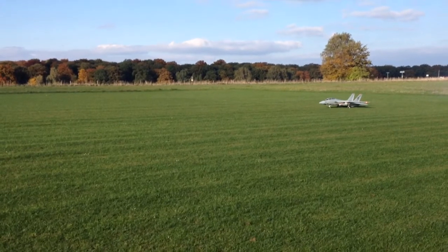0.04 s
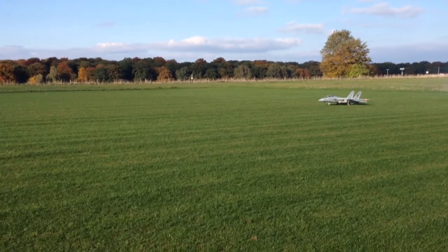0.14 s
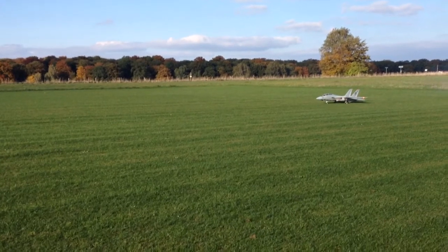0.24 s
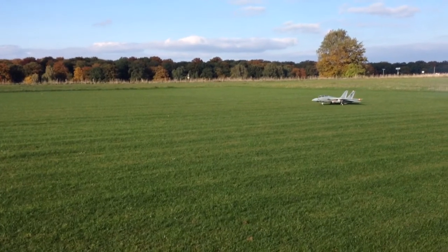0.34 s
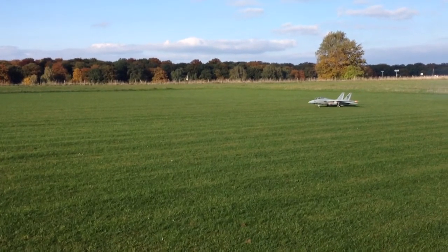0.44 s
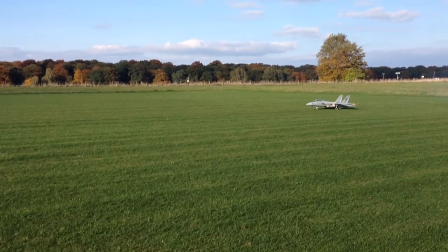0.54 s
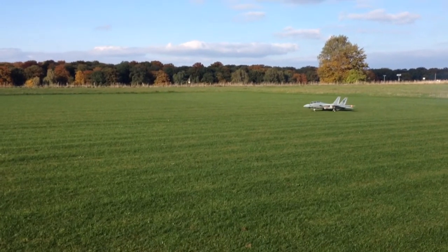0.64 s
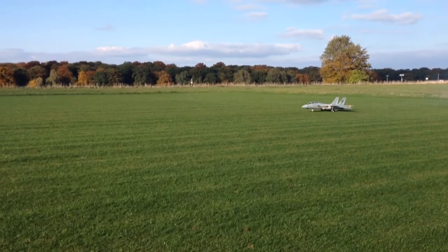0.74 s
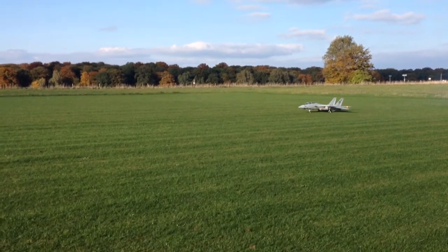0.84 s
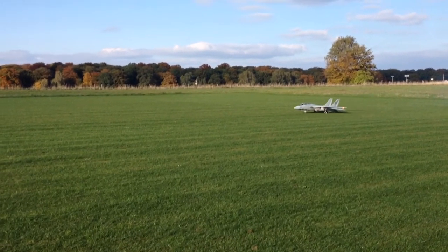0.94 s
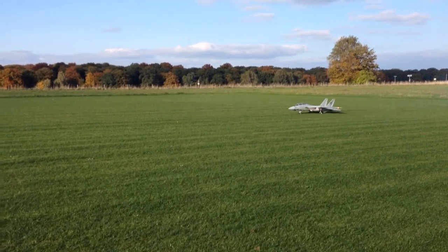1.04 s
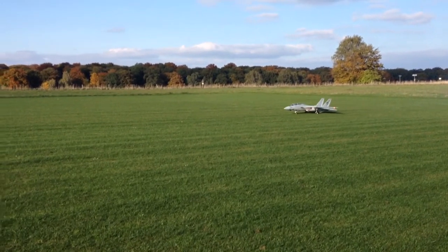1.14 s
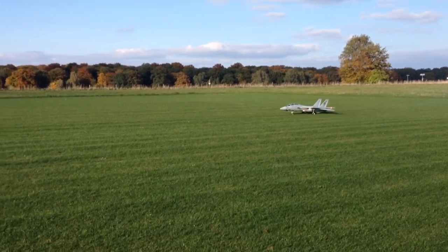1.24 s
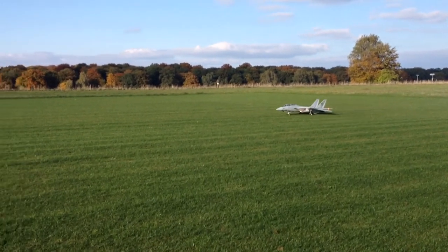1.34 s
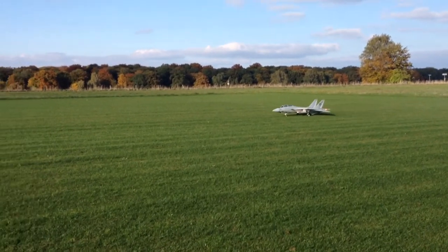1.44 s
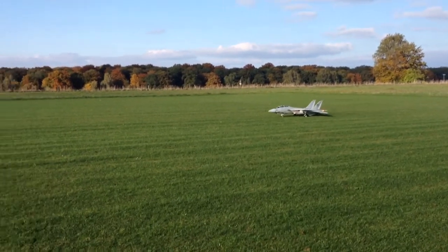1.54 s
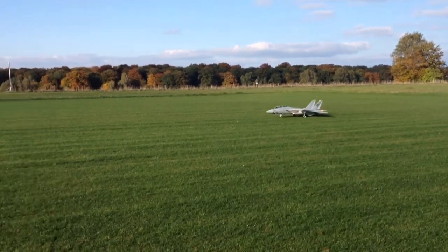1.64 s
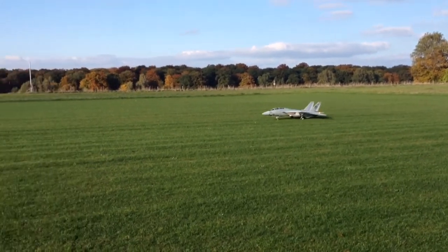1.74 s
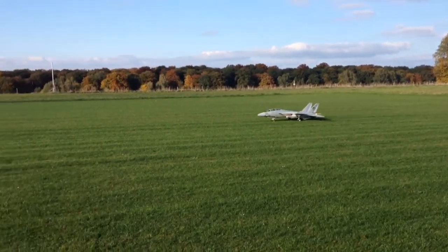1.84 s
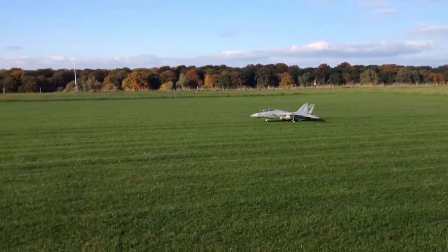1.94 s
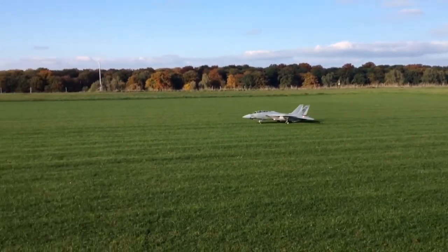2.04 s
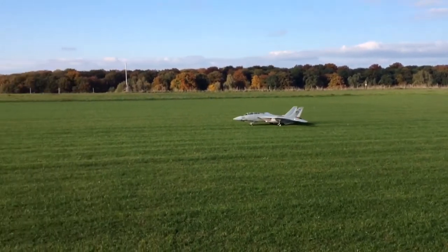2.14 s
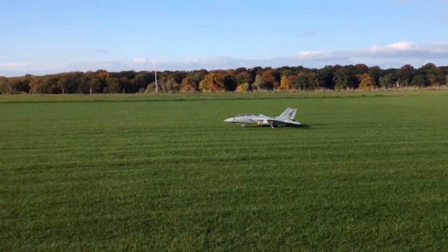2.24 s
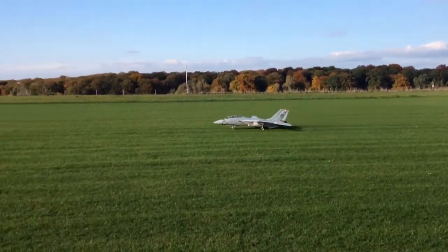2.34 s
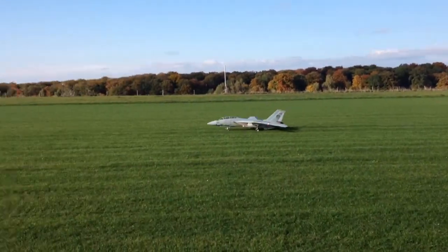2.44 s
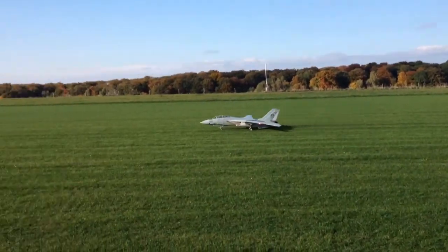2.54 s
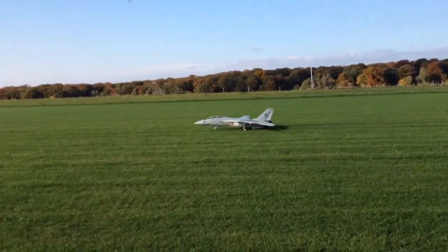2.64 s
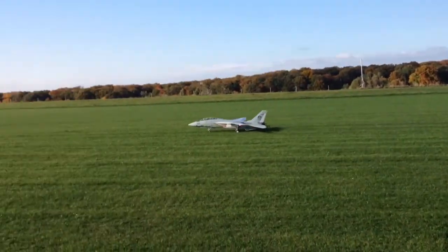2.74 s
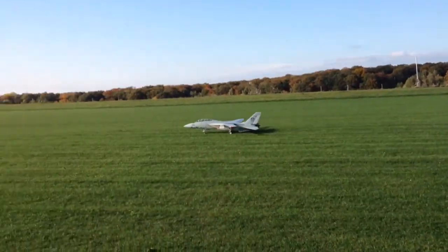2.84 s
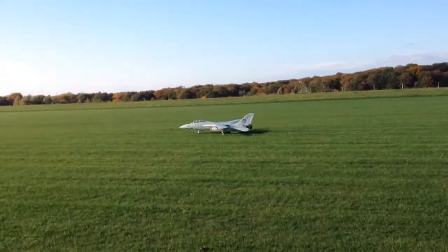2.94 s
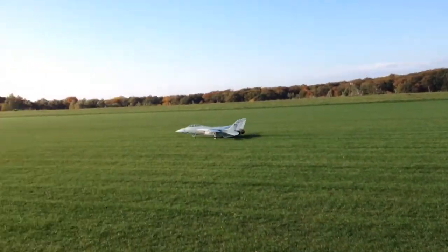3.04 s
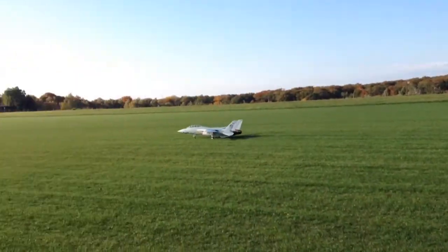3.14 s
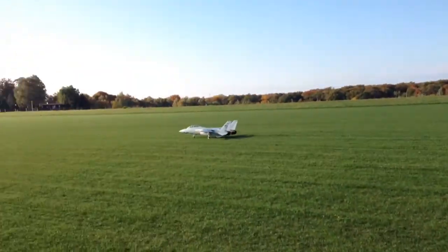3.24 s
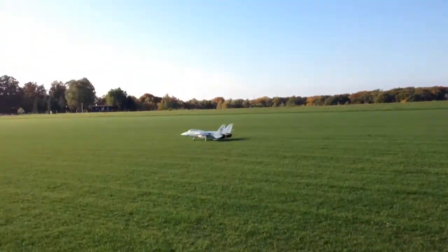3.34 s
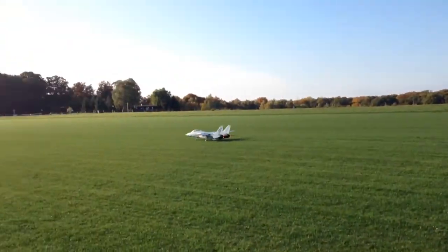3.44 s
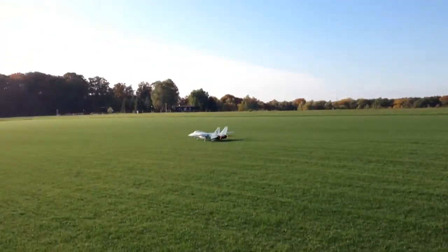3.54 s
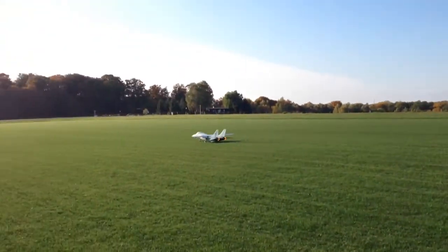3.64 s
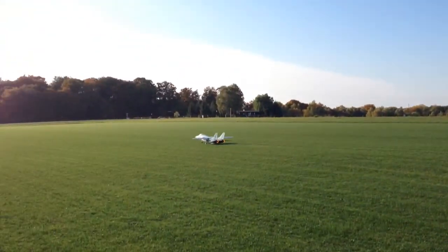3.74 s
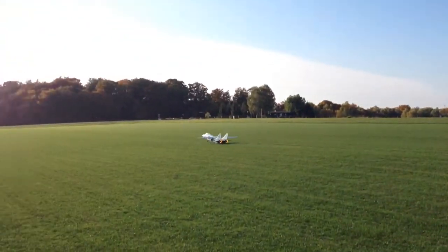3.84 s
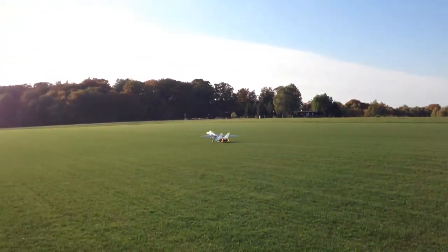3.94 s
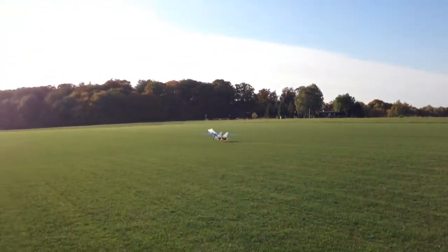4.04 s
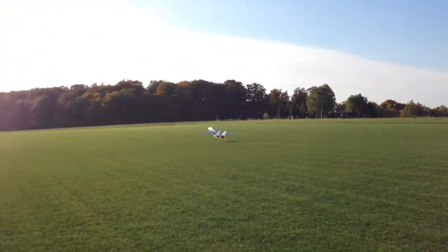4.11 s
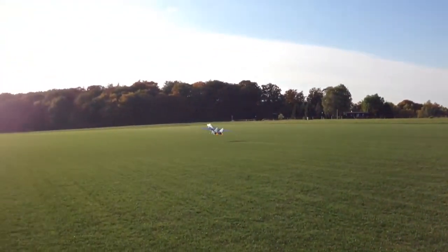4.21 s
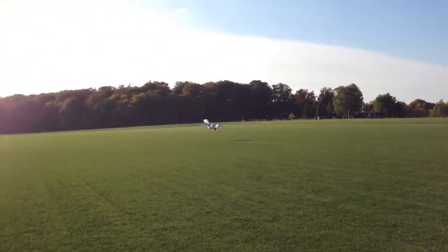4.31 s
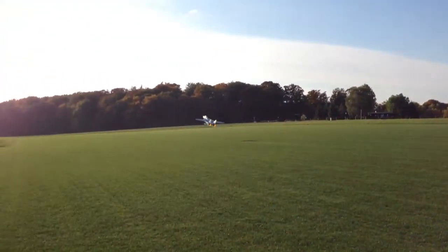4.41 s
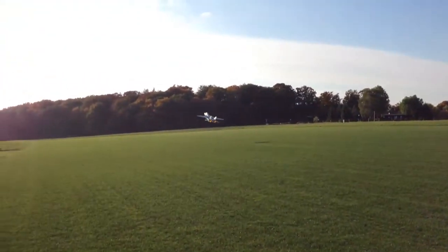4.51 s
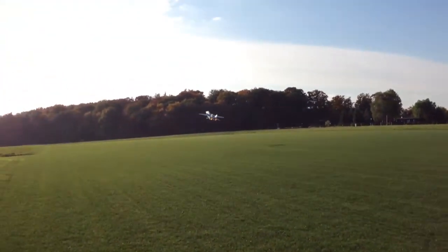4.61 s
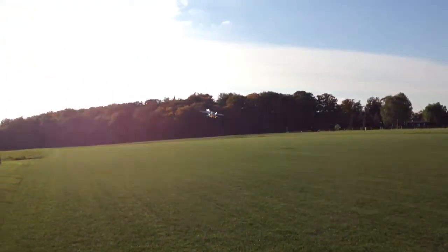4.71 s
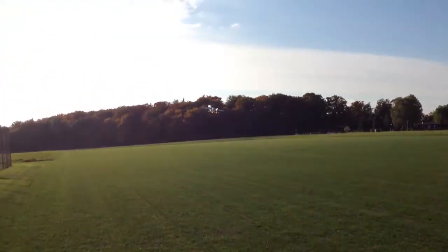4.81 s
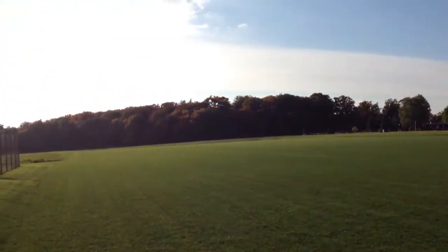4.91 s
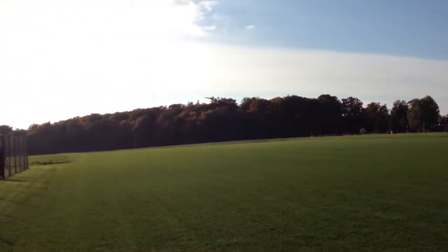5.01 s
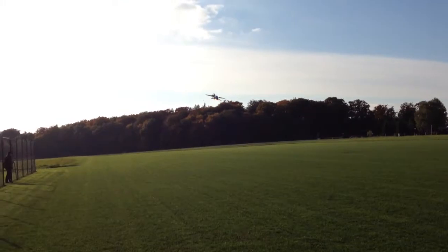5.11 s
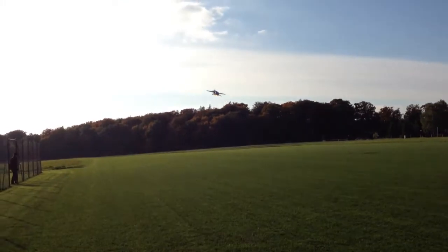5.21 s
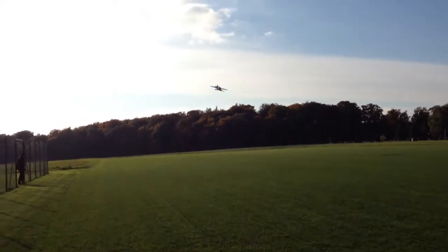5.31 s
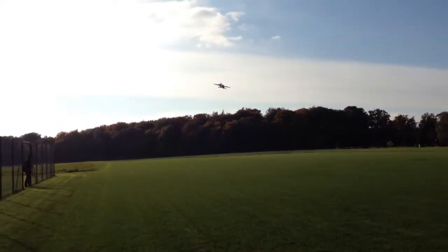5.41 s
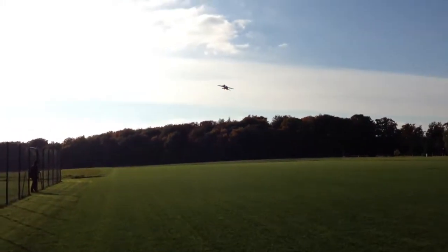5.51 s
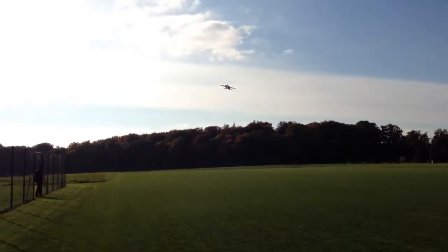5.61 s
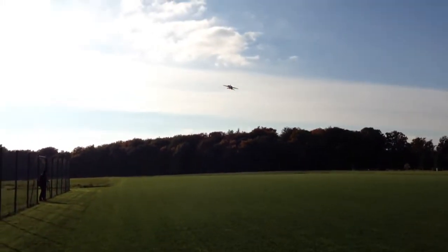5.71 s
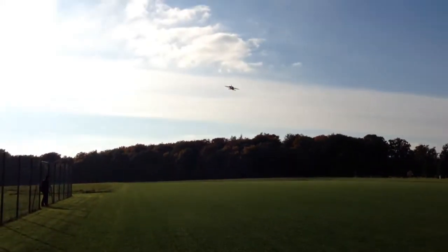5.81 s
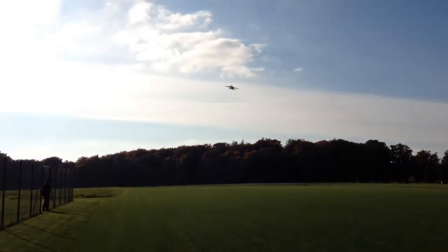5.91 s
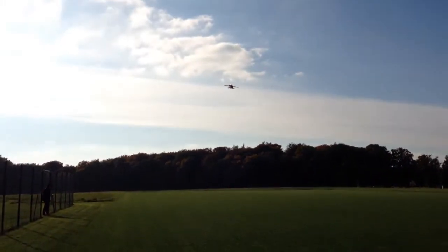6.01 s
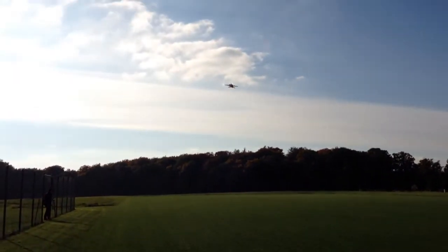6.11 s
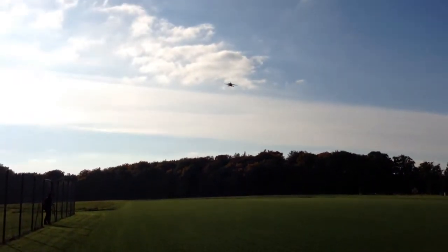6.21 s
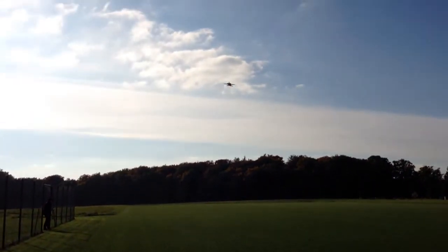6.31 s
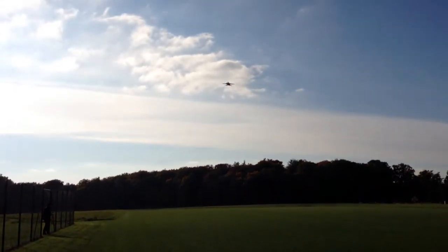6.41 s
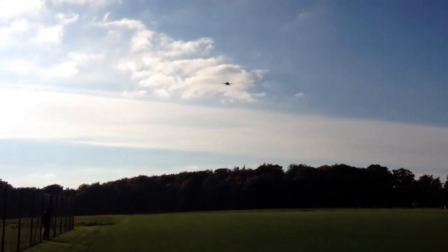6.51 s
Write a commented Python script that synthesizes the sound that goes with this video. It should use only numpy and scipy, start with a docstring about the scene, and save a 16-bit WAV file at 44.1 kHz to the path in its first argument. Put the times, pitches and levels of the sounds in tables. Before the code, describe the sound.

A small jet spools up with a thin rising whistle, rushes by on grass and roars off into the sky.

```python
"""Model jet taking off from grass

Two small turbines spool up; the jet drums over the turf, races past, lifts off and climbs away.
Its compressors whine ahead of it, its exhaust hisses sideways and roars behind, over a faint field rumble.
The echo off the grass lags more as the jet climbs, so a comb of notches sweeps down through the roar."""
import sys
import numpy as np
from scipy import signal
from scipy.fft import rfft, irfft, next_fast_len
from scipy.io import wavfile
from scipy.ndimage import map_coordinates

SR = 44100
rng = np.random.default_rng(int(sys.argv[2]) if len(sys.argv) > 2 else 0)


def waveform_to_disk(signal):
    """Save audio, clipped to [-1, 1], as 16-bit WAV at the path in sys.argv[1]."""
    frames = np.transpose(np.atleast_2d(signal))
    scaled = np.clip(frames, -1, 1) * 32767
    samples = np.round(scaled).astype(np.int16)
    wavfile.write(sys.argv[1], SR, samples)


N = 289336
TIME = np.arange(N) / SR
PASS_S, PASS_M, PASS_M_PER_S = 2.865, 12.6, 13  # the closest point: when, how near, how fast
ACCEL_M_PER_S2, LIFT_OFF_S = 4.9, 4.28
# the first turbine spools up to full power: (time [s], blade tone [Hz])
SPOOL_UP = [(0, 8500), (.3, 10370), (.5, 11380), (1, 12900), (1.35, 13800), (1.6, 14050), (2.2, 14180),
            (2.7, 14140)]


def amp(db):
    """Decibels to gain."""
    return 10 ** (np.asarray(db) / 20)


def along(table, hz):
    """Each column of a spectrum table, read on a log axis."""
    knots_hz, *columns = np.transpose(table)
    return [np.interp(np.log(hz + 1), np.log(knots_hz + 1), column) for column in columns]


def curves(table, t):
    """Each column of a time table, read at the times t."""
    knots_s, *columns = np.transpose(table)
    return [np.interp(t, knots_s, column) for column in columns]


def bell(x, centre, width):
    """A smooth hump of height 1."""
    return np.exp(-((x - centre) / width) ** 2)


def wobble(rate):
    """A smooth random curve, rate knots a second."""
    return map_coordinates(rng.standard_normal(int(N * rate / SR) + 4), [TIME * rate])


def rush(colour, frame=2048, hop=512):
    """Noise of steady rms 1 whose spectral shape follows colour(Hz, s)."""
    hz, t, spectra = signal.stft(rng.standard_normal(N), SR, nperseg=frame, noverlap=frame - hop)
    gain = colour(hz[:, None], t)
    gain = gain / np.sqrt(np.mean(gain ** 2, axis=0))
    noise = signal.istft(spectra * gain, SR, nperseg=frame, noverlap=frame - hop)[1][:N]
    return noise / np.sqrt(np.mean(noise ** 2) + 1e-20)


def speed(t):
    """The jet gains speed evenly [m/s]."""
    return PASS_M_PER_S + ACCEL_M_PER_S2 * (t - PASS_S)


def bearing(t):
    """Angle from the nose to the listener [rad]; its sine is the nearness, 1 at the closest point."""
    past_m = (t - PASS_S) * (speed(t) + PASS_M_PER_S) / 2
    return np.arctan2(PASS_M, -past_m)


def receding(t):
    """0 on approach, rising towards 1 as the jet goes away."""
    start = np.cos(bearing(0))
    return (start - np.cos(bearing(t))) / (start + 1)


def tilt(t, base_db, low_power_db, near_db, away_db, cone_db):
    """Brightness [dB per octave] from turbine power, nearness and the exhaust's backward cone."""
    blade_hz, = curves(SPOOL_UP, t)
    low_power = (blade_hz.max() - blade_hz) / np.ptp(blade_hz)
    near = np.sin(bearing(t)) ** 2
    cone = bell(np.degrees(bearing(t)), centre=141.5, width=12.7)
    return base_db + low_power_db * low_power + near_db * near + away_db * receding(t) + cone_db * cone


def ground_comb(hz, t, rolling_lag_s=.00022, lag_s_per_s=.000905, rotate_s=.14, grazing=.93, closest=.44):
    """The echo off the grass combs the sound: later as the jet climbs, deepest at grazing angles."""
    # grass as a mirror: (frequency [Hz], share reflected [0-1], phase lag [turns])
    grass = [(120, .7, .03), (220, .85, .055), (330, .9, .135), (650, .82, .125), (1200, .72, .11),
             (2000, .32, .05), (2800, .48, .02), (4000, .45, .01), (5500, .15, .01), (9000, .08, .01)]
    share, turns = along(grass, hz)
    climb_s = rotate_s * np.logaddexp(0, (t - LIFT_OFF_S) / rotate_s)  # eases into the climb
    lag_s = rolling_lag_s + lag_s_per_s * climb_s
    strength = grazing + (closest - grazing) * np.sin(bearing(t)) ** 2
    echo = np.clip(strength * share, 0, .97) * np.exp(-2j * np.pi * (hz * lag_s + turns))
    return np.abs(1 + echo)


def hollows(hz, t):
    """A row of narrow hollows in the treble drifts upwards as the jet passes."""
    # (approach centre [Hz], away centre [Hz], half width [Hz], approach depth [0-1], away depth [0-1])
    notches = [(2005, 2220, 200, .99, .62), (4530, 4610, 130, .45, .78), (6690, 7100, 170, .8, .8),
               (9000, 9530, 220, .8, .88), (11380, 11950, 250, .88, .92), (13200, 14080, 300, .88, .95)]
    drift = np.abs(receding(t)) ** 1.3
    gain = 1
    for front_hz, rear_hz, width_hz, front_depth, rear_depth in notches:
        centre_hz = front_hz + drift * (rear_hz - front_hz)
        depth = np.clip(front_depth + drift * (rear_depth - front_depth), 0, 1)
        gain = gain * (1 - depth / (1 + ((hz - centre_hz) / width_hz) ** 2))
    return gain


def roar_colour(hz, t, hum_width_hz=70):
    """The largest eddies roar, tilted by the angle of the nozzles, with a wandering hollow hum."""
    # the body of the roar: (frequency [Hz], relative level [dB])
    spectrum = [(25, -62), (55, -51), (80, -48), (110, -31.5), (150, -10), (220, -4.5), (300, -4), (420, 1),
                (720, -0.5), (980, -1), (1250, -5), (1650, -8), (2400, -23), (6000, -64), (12000, -120)]
    # the hum in the roar: (time [s], centre [Hz], lift [dB], lift of its near octave [dB])
    hum = [(.3, 524, 9.5, 0.5), (1.1, 424, 6.5, 0), (1.7, 543, -1.5, -3.5), (2.4, 530, 6.5, 3.5),
           (3.8, 507, 6.5, 7), (4.2, 443, 4, 0), (5.3, 534, 0.5, 1.5), (6.3, 558, 8.5, 1)]
    hum_hz, hum_db, octave_db = curves(hum, t)
    peak = lambda ratio: 1 / (1 + ((hz / ratio - hum_hz) / hum_width_hz) ** 2)
    slope = tilt(t, base_db=2.5, low_power_db=-4, near_db=.44, away_db=-2.5, cone_db=-2.9)
    colour_db = slope * np.log2(np.clip(hz, 150, 2500)) + hum_db * peak(1) + octave_db * peak(1.84)
    return amp(along(spectrum, hz)[0] + colour_db) * ground_comb(hz, t) * hollows(hz, t)


def treble_colour(source_db, hz, t, air_db_per_m=.07):
    """Small eddies sound brightest in the exhaust cone; the air dulls them with distance."""
    slope = tilt(t, base_db=1.5, low_power_db=-2, near_db=1, away_db=-1.5, cone_db=8.5)
    beyond_m = PASS_M / np.sin(bearing(t)) - PASS_M
    air_db = -air_db_per_m * beyond_m * (hz / 10000) ** 2
    source = amp(source_db + air_db + slope * np.log2(np.maximum(hz, 3200)))
    return source * ground_comb(hz, t) * hollows(hz, t)


def hiss_colour(hz, t):
    """The hiss morphs from its front to its rear colour as the jet passes."""
    # the hiss from each side: (frequency [Hz], relative level ahead [dB], relative level behind [dB])
    spectra = [(800, -37, -52), (1590, -11, -23), (2110, -5.5, -2.5), (2700, -0.5, 0), (2980, 2, 2.5),
               (3150, -1, 3.5), (3930, -9.5, 0), (4450, -7, -8), (4920, 0.5, -1), (5980, 0, -1.5),
               (6870, -7.5, -12), (8070, -10.5, -20), (13000, -120, -120)]
    front_db, rear_db = along(spectra, hz)
    return treble_colour(front_db + receding(t) * (rear_db - front_db), hz, t)


def sizzle_colour(hz, t):
    """The finest eddies sizzle on top of the hiss."""
    # the sizzle's band: (frequency [Hz], relative level [dB])
    spectrum = [(3000, -90), (5500, -38), (6700, -3), (7400, 3), (8300, 1), (9500, -2), (10600, -1),
                (12200, -8), (13200, -8), (14600, -9), (15300, -23)]
    return treble_colour(along(spectrum, hz)[0], hz, t)


def exhaust(dip_s=.05):
    """The jets roar, hiss and sizzle; restless air makes the treble flutter."""
    # the roar's fader: (time [s], level [dB])
    roar_levels = [(0, -22), (.3, -20.5), (.55, -25), (1.2, -21.5), (2.35, -19.5), (2.95, -20.5),
                   (3.36, -20), (3.5, -16.5), (4, -15), (4.12, -18), (4.34, -17.5), (4.48, -19.6),
                   (4.9, -17.5), (5.45, -19), (6, -18), (6.56, -19.5)]
    # the treble's faders: (time [s], hiss level [dB], sizzle level [dB])
    treble_levels = [(0, -32, -37.5), (.35, -26, -32.5), (.52, -24.5, -34), (1.24, -17.5, -27.5),
                     (1.75, -18, -30), (2.2, -16, -27.5), (3.26, -15, -23.5), (3.44, -18.5, -30.5),
                     (3.78, -25, -33), (4, -22.7, -30.5), (4.12, -26.7, -36), (4.33, -20.5, -31),
                     (4.5, -25.5, -35.5), (4.76, -27.5, -37.5), (4.91, -25, -34), (5.06, -27.7, -40.5),
                     (5.38, -29, -42), (5.97, -32.5, -48.5), (6.12, -29.5, -45), (6.26, -32, -49),
                     (6.56, -29.5, -46)]
    # the whole exhaust dips briefly: (time [s], gain [dB])
    dips = [(1.89, -2.5), (2.74, -2.5), (3.01, -1)]
    roar_db, = curves(roar_levels, TIME)
    hiss_db, sizzle_db = curves(treble_levels, TIME)
    roar = amp(roar_db) * rush(roar_colour)
    hiss = amp(hiss_db) * rush(hiss_colour)
    sizzle = amp(sizzle_db) * rush(sizzle_colour)
    flutter = wobble(40)
    hiss *= amp(.65 * flutter)
    sizzle *= amp(.5 * flutter + .85 * wobble(60))
    dip_db = sum(db * bell(TIME, at_s, dip_s) for at_s, db in dips)
    return amp(dip_db) * (roar + hiss + sizzle)


def blade_tone(hz, level_db, jitter_hz=12, flutter_db=3):
    """A compressor's whistle, slightly unsteady in pitch and strength."""
    phase = 2 * np.pi * np.cumsum(hz + jitter_hz * wobble(144)) / SR
    return amp(level_db + flutter_db * wobble(50.2)) * np.sqrt(2) * np.sin(phase)


def compressors(twin_db=-12, fade_db_per_s=30):
    """Two turbines spool up a little apart; their whine beams forwards and fades as they pass."""
    # the second turbine catches up and overtakes: (time [s], pitch above the first [Hz])
    twin_offsets = [(.33, -500), (.6, -0.5), (1.15, 29), (1.33, 320), (2.1, 380)]
    # the whine until the intakes turn away: (time [s], level [dB])
    whine_levels = [(0, -51), (.25, -45), (.34, -30), (.47, -41), (.8, -31), (.94, -40), (1.08, -34),
                    (1.55, -28.5), (1.94, -38), (2.08, -31), (2.5, -41)]
    hz, = curves(SPOOL_UP, TIME)
    apart_hz, = curves(twin_offsets, TIME)
    turned_away_s = np.maximum(TIME - whine_levels[-1][0], 0)
    level_db = curves(whine_levels, TIME)[0] - fade_db_per_s * turned_away_s
    return blade_tone(hz, level_db) + blade_tone(hz + apart_hz, level_db + twin_db)


def wheels(full_load_db=-30, bump_s=.06):
    """Bumps in the turf drum on the hollow airframe, less as the wings take the weight."""
    # the bigger bumps: (time [s], lift [dB])
    bumps = [(2.33, 6.5), (2.61, 5), (2.84, 5)]
    # the airframe's boom: (frequency [Hz], relative level [dB])
    airframe = [(25, -46), (60, -33), (90, -26), (130, 0), (190, 4.5), (300, -1.5), (700, -33),
                (2000, -120)]
    load = np.maximum(1 - (speed(TIME) / speed(LIFT_OFF_S)) ** 2, 0)
    nearness = np.sin(bearing(TIME))
    bump_db = sum(db * bell(TIME, at_s, bump_s) for at_s, db in bumps)
    level_db = full_load_db + bump_db + .6 * wobble(21)
    return load * nearness * amp(level_db) * rush(lambda hz, t: amp(along(airframe, hz)[0]))


def field(level_db=-58):
    """A faint bed of outdoor rumble, gently swelling and sinking."""
    # the open field: (frequency [Hz], relative level [dB])
    spectrum = [(25, -22), (55, -17), (90, 8), (140, 17), (250, -16), (800, -22), (3000, -35), (15000, -70)]
    return amp(level_db + 1.8 * wobble(3.3)) * rush(lambda hz, t: amp(along(spectrum, hz)[0]))


def scene():
    """The jet over the field's rumble, the same in both channels."""
    mix = exhaust() + compressors() + wheels() + field()
    return np.array([mix, mix])


def record(dry, ceiling=.98, top_hz=15280):
    """A soft clip rounds off the tallest peaks, then a brick-wall low-pass cuts the very top."""
    rounded = dry / (1 + np.abs(dry / ceiling) ** 8) ** (1 / 8)
    size = next_fast_len(N + SR // 2)
    passband = np.fft.rfftfreq(size, 1 / SR) < top_hz
    return irfft(rfft(rounded, size) * passband, size)[:, :N]


dry = scene()
out = record(dry)
waveform_to_disk(out)
```